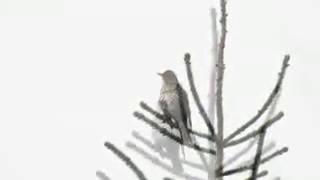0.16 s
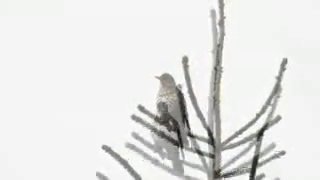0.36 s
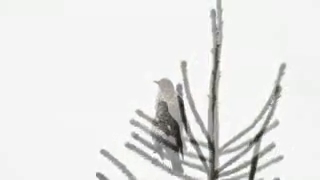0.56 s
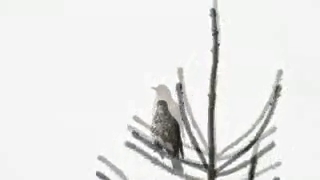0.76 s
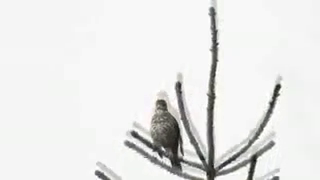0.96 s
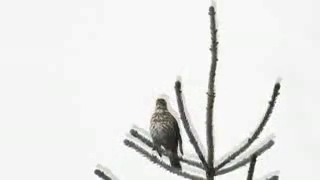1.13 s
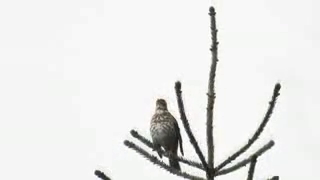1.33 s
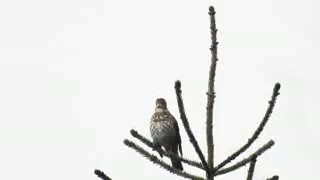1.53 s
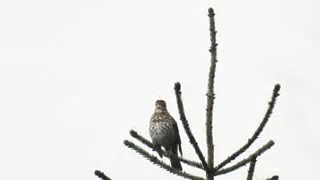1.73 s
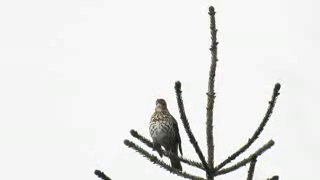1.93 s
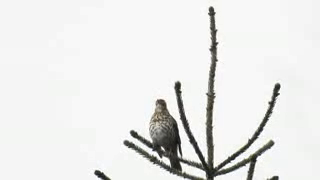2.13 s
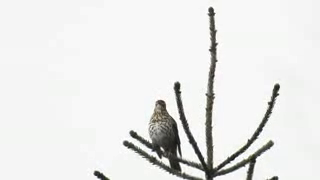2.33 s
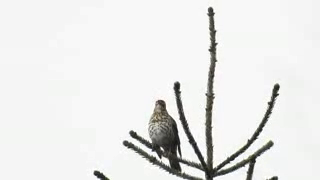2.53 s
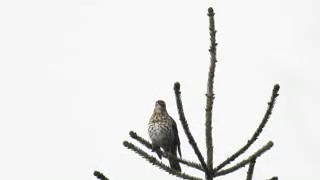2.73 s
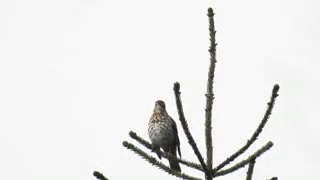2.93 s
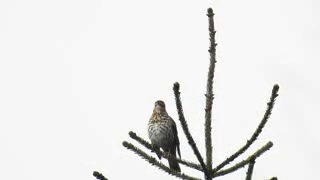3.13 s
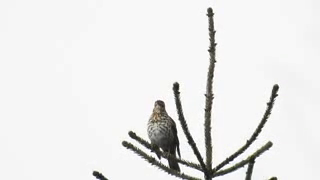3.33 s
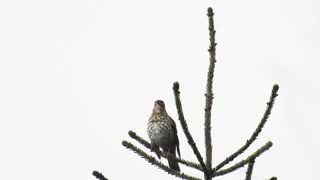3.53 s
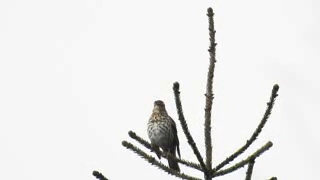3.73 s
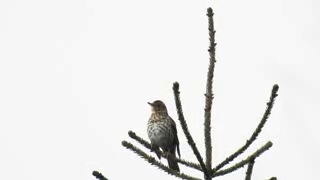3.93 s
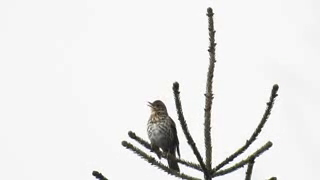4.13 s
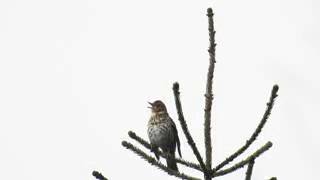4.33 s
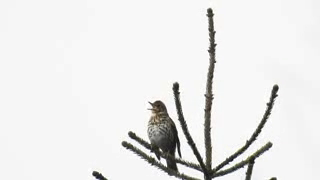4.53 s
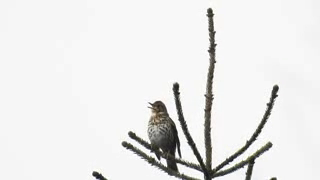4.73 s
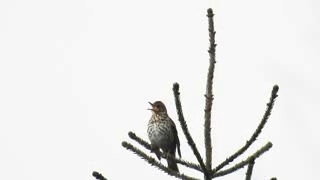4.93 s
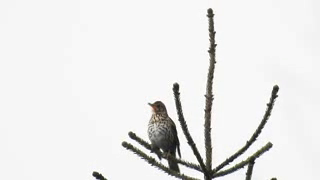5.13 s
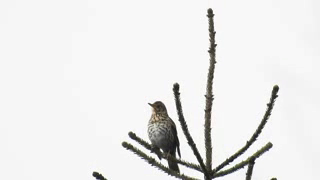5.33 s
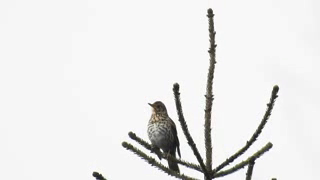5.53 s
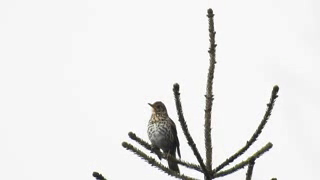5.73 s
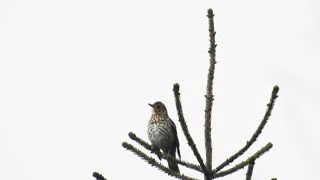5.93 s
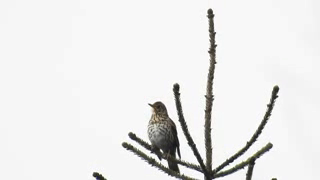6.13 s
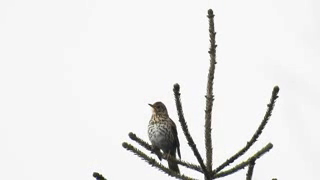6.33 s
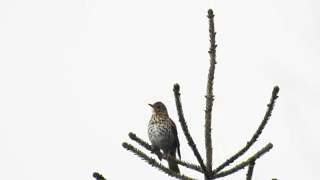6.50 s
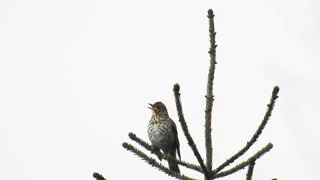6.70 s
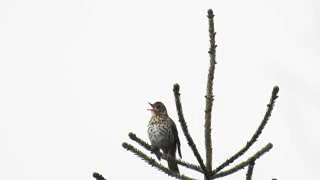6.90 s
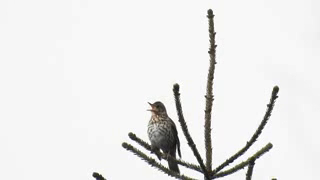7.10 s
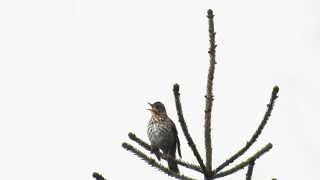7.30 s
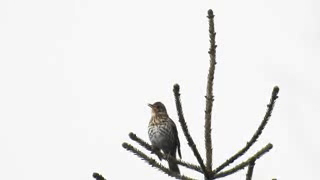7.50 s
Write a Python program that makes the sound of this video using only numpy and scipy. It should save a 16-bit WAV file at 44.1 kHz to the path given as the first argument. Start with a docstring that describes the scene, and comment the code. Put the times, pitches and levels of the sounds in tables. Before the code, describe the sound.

Quick falling chirps, rasps, nasal notes, clear whistles and whip-like sweeps from one thrush, with fainter birds chirping in the woods behind.

```python
"""Over a low outdoor hush and a blurred far chorus, a song thrush opens with quick, bright, falling notes.
From the top of a spruce it goes on with twitters, rasps, whistles, down-sweeps and two-voiced notes.
Each side of its syrinx is a near-sinusoidal gliding tone; the trees scatter it into a fading tail.
Other birds are similar glides, the farther ones with weaker direct sound; shaped noise makes the hush.
A few soft thumps are damped low oscillations."""
import sys
import numpy as np
from scipy import signal
from scipy.fft import rfft, irfft, next_fast_len
from scipy.io import wavfile
from scipy.ndimage import uniform_filter1d

SR = 44100
rng = np.random.default_rng(int(sys.argv[2]) if len(sys.argv) > 2 else 0)


def wrap_up_sound(samples):
    """Save the sound to the file named by the first command line argument, as 16-bit audio."""
    columns = np.atleast_2d(samples).T
    # keep every value between -1 and 1, then stretch to whole-number steps
    tamed = np.clip(columns, -1, 1)
    steps = np.round(tamed * 32767).astype(np.int16)
    wavfile.write(sys.argv[1], SR, steps)


N = 337806
TIME = np.arange(N) / SR


def from_db(db):
    """Logarithmic level: decibels to amplitude gain."""
    return 10 ** (np.asarray(db) / 20)


def rms_one(x):
    """Normalisation: scale a signal to unit rms."""
    return x / np.sqrt(np.mean(x ** 2) + 1e-20)


def drift(rate, size):
    """Random modulation about zero: straight lines join `rate` new normal values a second."""
    knots = rng.standard_normal(4096)
    return np.interp(np.arange(size) / SR * rate, np.arange(len(knots)), knots)


def coloured_noise(spectrum):
    """Spectral shaping: white noise weighted by a level curve over log frequency, at unit rms."""
    hz, db = np.transpose(spectrum)
    fft_size = next_fast_len(N, True)
    bins = np.maximum(np.fft.rfftfreq(fft_size, 1 / SR), 1)
    gain = from_db(np.interp(np.log(bins), np.log(hz), db))
    white = rng.standard_normal(N)
    return rms_one(irfft(rfft(white, fft_size) * gain)[:N])


def add(track, start, sound):
    """Superposition: mix a sound into the track from `start` seconds on."""
    at = int(np.clip(start * SR, 0, N))
    track[at:at + len(sound)] += sound[:N - at]


def contour(rows):
    """Interpolation: start time and smoothed per-sample columns of one note."""
    s, *columns = np.transpose(rows)
    s = np.sort(s) + np.arange(len(s)) / SR  # keeps the times distinct
    t = np.arange(s[0], s[-1], 1 / SR)
    curves = [np.interp(t, s, column) for column in columns]
    return s[0], [uniform_filter1d(curve, size=110, mode="nearest") for curve in curves]


def arch(length, start_hz, middle_hz, end_hz):
    """Parabolic glide: pitch through the start, middle and end of a note."""
    u = np.linspace(0, 1, max(int(length * SR), 20))
    bend = 2 * (2 * middle_hz - start_hz - end_hz)
    return start_hz + (end_hz - start_hz) * u + bend * u * (1 - u)


def syrinx(hz, waver=0.0036, waver_rate=400):
    """Frequency modulation: phase of a membrane following a pitch with slight unsteadiness."""
    return 2 * np.pi * np.cumsum(hz * (1 + waver * drift(waver_rate, len(hz)))) / SR


def valve(size, edge_s=.002):
    """Amplitude gating: the airflow opens and closes quickly at the ends of a note."""
    return signal.windows.tukey(size, min(1, 2 * edge_s * SR / size))


def tone(hz, second_db=-27, throat_hz=7000):
    """Source and filter: the throat passes little second harmonic, and less the higher it lies."""
    phase = syrinx(hz)
    second_gain = from_db(second_db) / (1 + (2 * hz / throat_hz) ** 4)
    return np.sin(phase) + second_gain * np.sin(2 * phase)


def slur(length, start_hz, middle_hz, end_hz, taper=0.87):
    """Joint pitch and amplitude modulation: one parabolic glide that swells and fades."""
    hz = arch(length, start_hz, middle_hz, end_hz)
    return tone(hz) * signal.windows.tukey(len(hz), taper)


def slurs(table, taper):
    """Superposition: a table of glides played in turn."""
    out = np.zeros(N)
    for start, length, start_hz, middle_hz, end_hz, db in table:
        add(out, start, from_db(db) * slur(length, start_hz, middle_hz, end_hz, taper))
    return out


def runs(table, taper):
    """Periodicity: each row sounds its slur at every whole period between start and stop."""
    notes = []
    for start, stop, period, *note in table:
        notes += [(s, *note) for s in np.arange(start, stop, period)]
    return slurs(notes, taper)


def whistled(notes):
    """Membrane control: pure notes follow the tension and the pressure in the syrinx."""
    out = np.zeros(N)
    for note in notes:
        start, (hz, db) = contour(note)
        add(out, start, from_db(db) * tone(hz) * valve(len(hz)))
    return out


def motif(shape, events):
    """Transposition: one gesture sung at other times, pitches and strengths."""
    return whistled([[(s + dt, ratio * hz, db + rel_db) for dt, hz, rel_db in shape]
                     for s, ratio, db in events])


def trees(x, low_t60, high_t60, first_s=0.005, split_hz=4500):
    """Reverberation: a dense unit-energy tail from trunks and crowns, with a t60/s for each band."""
    t = TIME[:SR]
    low_pass = signal.butter(2, split_hz, fs=SR, output="sos")
    high_pass = signal.butter(2, split_hz, "high", fs=SR, output="sos")
    low = signal.sosfilt(low_pass, rng.standard_normal(SR)) * from_db(-60 * t / low_t60)
    high = signal.sosfilt(high_pass, rng.standard_normal(SR)) * from_db(-60 * t / high_t60)
    tail = (low + high) * np.clip(t / first_s - 1, 0, 1)  # silent until first_s
    return signal.fftconvolve(x, rms_one(tail) / np.sqrt(SR))[:N]


def echo(x, delay_s):
    """Specular reflection: one delayed copy."""
    return np.interp(TIME - delay_s, TIME, x, left=0)


def far_twitter(count=1800, low_hz=2600, high_hz=6000, glide=.25):
    """Incoherent summation: many birds' short glides at random times and pitches, at unit rms."""
    out = np.zeros(N)
    for when, pitch, length, rise, curve, strength in rng.random((count, 6)):
        hz = low_hz * (high_hz / low_hz) ** pitch
        bend = glide * np.sign(rise - .4)  # a few more rise than fall
        middle_hz = hz * (1 + glide * (curve - .5))
        note = slur(0.01 + .025 * length, hz * (1 - bend), middle_hz, hz * (1 + bend))
        add(out, when * N / SR, from_db(-24 * strength) * note)
    return rms_one(out)


# spectral density of the blurred chorus: f/Hz, relative level/dB
CHORUS_COLOUR = [(1700, -14.5), (2200, 2.5), (3000, 4.5), (4500, 1), (6000, -1.5), (7000, -11.5),
                 (8500, -55.5)]
# course of the distant birds: t/s, level before CHORUS_DB/dB
CHORUS_LEVEL = [(0.0, -44), (0.45, -48), (0.64, -55.5), (2.41, -51), (2.79, -51.5), (3.2, -47), (3.88, -47),
                (4.46, -53), (4.93, -50.5), (5.37, -52.5), (5.76, -52), (6.31, -58.5), (6.98, -55.5),
                (7.25, -48), (7.42, -52.5), (7.66, -55.5)]
CHORUS_DB = 4.5  # gain on the course


def chorus():
    """Diffuse field: distant twitter, its scattered tail and shaped noise merge."""
    twitter = far_twitter()
    blur = from_db(-5) * twitter
    blur += from_db(-1.5) * trees(twitter, low_t60=0.24, high_t60=0.19)
    blur += from_db(-5.5) * coloured_noise(CHORUS_COLOUR)
    course_db = np.interp(TIME, *np.transpose(CHORUS_LEVEL))
    return from_db(CHORUS_DB + course_db + 0.53 * drift(13, N)) * rms_one(blur)


# spectral density of the rustle: f/Hz, relative level/dB
RUSTLE_COLOUR = [(100, -1.5), (280, -1), (450, -2), (800, -9.5), (1250, -9), (1800, -14), (4000, -58)]
# course of the low rustle of air: t/s, level before RUSTLE_DB/dB
RUSTLE_LEVEL = [(0.0, -55.5), (3.56, -57.5), (3.88, -54), (5.12, -51), (5.57, -57.5), (5.85, -56.5),
                (5.99, -54.5), (6.23, -51.5), (7.21, -57.5), (7.66, -55)]
RUSTLE_DB = -0.5  # gain on the course


def rustle():
    """Modulated noise: a low rustle of air rises and falls."""
    course_db = np.interp(TIME, *np.transpose(RUSTLE_LEVEL))
    return from_db(RUSTLE_DB + course_db + 3.1 * drift(25, N)) * coloured_noise(RUSTLE_COLOUR)


# spectral density of the hush: f/Hz, relative level/dB
HUSH_COLOUR = [(12, -23), (20, 3.5), (65, 3), (124, -8.5), (197, -3.5), (260, -20.5), (498, -16.5),
               (904, -22), (1050, -16.5), (1220, -32.5), (1700, -32.5), (2210, -50.5), (3740, -120)]
HUSH_DB = -52  # centre of the drifting level


def hush():
    """Modulated noise: a low outdoor hush with a slightly unsteady level."""
    return from_db(HUSH_DB + 1.1 * drift(8.9, N)) * coloured_noise(HUSH_COLOUR)


def air():
    """Stationary noise: a faint, steady hiss."""
    colour = [(500, -19.0), (1700, -1.5), (5000, -5.5), (7000, 2.0), (9000, -14)]  # f/Hz, level/dB
    return from_db(-60.5) * coloured_noise(colour)


# short arched slurs: start t/s, length t/s, start f/Hz, middle f/Hz, end f/Hz, level/dB
SLURS = [ (.006, 0.021, 8240, 6980, 6550, -29.5), (.297, 0.0044, 6320, 5300, 4700, -33),
         (.324, .025, 3170, 3240, 3950, -37.5), (.616, 0.027, 2490, 3050, 2650, -30),
         (1.19, .03, 3030, 3374, 2970, -36), (1.366, 0.023, 2640, 3120, 2820, -34),
         (2.277, 0.033, 4460, 4240, 3850, -39.5), (3.99, 0.038, 2510, 2770, 3130, -36.5),
         (4.724, .035, 3560, 3320, 3420, -38), (5.123, 0.0034, 6500, 5990, 5270, -23),
         (5.173, 0.0084, 4150, 5630, 6450, -29), (5.598, 0.073, 2545, 2740, 2980, -36.5),
         (5.622, 0.038, 3620, 3430, 4000, -33.5), (5.658, .05, 3700, 4150, 3250, -36.5),
         (5.903, 0.033, 3710, 3870, 3230, -36.5), (5.975, 0.026, 2970, 3370, 3230, -38.5),
         (6.69, 0.12, 2720, 2884, 2590, -43), (6.945, .021, 2980, 3620, 2900, -40),
         (7.05, .018, 5750, 4860, 4140, -30.5), (7.051, .016, 7830, 7100, 6500, -38.5),
         (7.102, 0.015, 2780, 3720, 3140, -32.5), (7.168, .035, 3460, 3100, 2460, -35),
         (7.385, .039, 2600, 3570, 3600, -39), (7.385, 0.045, 7000, 6230, 6120, -36), ]


def arched_slurs():
    """Parabolic glide: short slurred notes, single glides up, down or over a bend."""
    return slurs(SLURS, taper=0.34)


# reflections from the ground: delay t/s, level against the direct sound/dB
NEAR_ECHOES = [(.012, -17), (0.0157, -12.5)]


def near_field(song):
    """Direct and reverberant sound: the song, two ground echoes, a short and a long scattered tail."""
    near = song + sum(from_db(db) * echo(song, s) for s, db in NEAR_ECHOES)
    near += from_db(-14) * trees(song, low_t60=.14, high_t60=.2)
    near += from_db(-8.5) * trees(song, low_t60=0.98, high_t60=0.63)
    return near


# notes that hold and then droop: start t/s, length t/s, held f/Hz, end f/Hz, level/dB
DROOPS = [ (.024, .023, 6700, 5800, -22.5), (.048, 0.025, 6340, 5550, -19),
          (.175, 0.015, 5640, 4070, -32.5), (1.192, 0.052, 2363, 1993, -28),
          (1.255, .059, 2944, 1993, -29.5), (1.373, 0.032, 2370, 2080, -33.5),
          (2.299, .079, 2500, 2428, -38), (3.848, .11, 2510, 2427, -39.5),
          (4.017, 0.069, 2527, 2240, -37.5), (5.738, 0.038, 2688, 2645, -34),
          (7.062, .021, 6420, 5900, -24), (7.085, 0.016, 6230, 4980, -19), (7.157, 0.011, 5390, 3550, -22),
          ]
# how late the pitch gives way; share of the note spent swelling and fading
DROOP_POWER, DROOP_TAPER = 2.2, 0.28


def droops():
    """Power-law glide: the tension holds, then gives way ever faster."""
    out = np.zeros(N)
    for start, length, held_hz, end_hz, db in DROOPS:
        u = np.linspace(0, 1, int(length * SR))
        hz = held_hz + (end_hz - held_hz) * u ** DROOP_POWER
        swell = signal.windows.tukey(len(u), DROOP_TAPER)
        add(out, start, from_db(db) * swell * tone(hz))
    return out


# whistles, one brief and two drawn out, one curve a note: t/s, f/Hz, rms level/dB
WHISTLES = [
    [(0.072, 6290, -25), (0.088, 5886, -17), (0.108, 5854, -24.5), (0.123, 5600, -26)],
    [(2.125, 2474, -42), (2.171, 2459, -46), (2.251, 2512, -43), (2.297, 2864, -41)],
    [(5.176, 6100, -25.5), (5.184, 6700, -26), (5.194, 6841, -23.5), (5.294, 6763, -27),
     (5.302, 6821, -31.5), (5.314, 6820, -23), (5.338, 6830, -25.5), (5.368, 6900, -36.5)],
]


def curved_whistles():
    """Membrane control: three whistles, each with its own curve of pitch and level."""
    return np.sqrt(2) * whistled(WHISTLES)  # rms to peak


# soft thumps: start t/s, f/Hz, level/dB, decay t60/s
THUMPS = [(0.19, 134, -29.5, 0.026), (0.423, 132, -20, 0.03), (1.158, 60, -34, 0.097),
          (1.346, 258, -32.5, 0.02), (1.688, 205.2, -26.5, 0.023), (1.923, 223, -33, 0.1),
          (2.454, 228, -42.5, 0.25), (3.695, 920, -29, 0.01), (3.705, 300, -31, 0.011),
          (6.015, 172, -23.5, 0.016)]


def thumps():
    """Damped oscillation: dull knocks, each a sinusoid that dies exponentially."""
    out, t = np.zeros(N), TIME[:SR // 2]
    for start, hz, db, t60 in THUMPS:
        onset = 1 - np.exp(-t / 0.00045)
        add(out, start, from_db(db - 60 * t / t60) * np.sin(2 * np.pi * hz * t) * onset)
    return out


# thin whistles of birds farther off, levels before the far field:
# start t/s, length t/s, held f/Hz, start below held (negative: above) f/Hz, held level/dB
THIN_WHISTLES = [(0.571, 0.1, 7560, 7, -44), (1.504, 0.11, 7470, 2498, -41.5),
                 (2.848, 0.081, 7520, 700, -47.5), (3.08, 0.069, 7600, 2, -51),
                 (3.432, 0.057, 6800, 301, -42), (5.986, 0.17, 7580, -11, -51.5),
                 (6.243, 0.13, 7530, 2495, -45.5), (6.504, 0.12, 7660, 2304, -44)]
SCOOP_S, SCOOP_DB = .009, 5  # time constant of settling; extra level at the start


def thin_whistles():
    """Exponential relaxation: high whistles settle to their pitch, most from below, and hold it."""
    out = np.zeros(N)
    for start, length, held_hz, scoop_hz, db in THIN_WHISTLES:
        scoop = np.exp(-TIME[:int(length * SR)] / SCOOP_S)
        level = from_db(db + SCOOP_DB * np.sqrt(scoop))
        add(out, start, level * tone(held_hz - scoop_hz * scoop) * valve(len(scoop)))
    return out


# echoes of the farther birds: delay t/s, level against their direct sound/dB
FAR_ECHOES = [(0.017, -11), (0.045, -26), (.063, -15)]


def far_field(calls):
    """Direct and reverberant sound: weakened calls, distinct echoes and a scattered tail."""
    direct = calls + sum(from_db(db) * echo(calls, s) for s, db in FAR_ECHOES)
    return from_db(-3.5) * direct + from_db(-5.0) * trees(calls, low_t60=0.74, high_t60=0.47)


# a low note that flicks up and drops away: t from its crest/s, f/Hz, relative level/dB
HOOK_SHAPE = [(-.033, 2156, -9.5), (-.012, 2226, -4.5), (0, 2480, 3.5), (.013, 1982, -8)]
# crest t/s, pitch ratio/1, level/dB
HOOKS = [(.66, 0.99, -24.5), (1.829, 0.99, -25.5), (1.991, .94, -27.5)]


def hooks():
    """Transposition: the low, flicked note recurs."""
    return motif(HOOK_SHAPE, HOOKS)


# a far bird's falling note: t from its start/s, f/Hz, relative level/dB
FALL_SHAPE = [(0, 5915, -12), (.012, 5720, -1.5), (.04, 5380, -1), (.064, 5170, -1), (.08, 4940, -13)]
# start t/s, pitch ratio/1, level before the far field/dB
FALLS = [(.778, 0.99, -37), (.904, 1, -36), (1.026, 0.99, -34.5), (1.151, 1.01, -35.5), (1.276, 1.0, -32.5),
         (6.727, 1.022, -33), (6.846, 1.015, -32.5), (6.991, 0.98, -32)]


def far_falls():
    """Transposition: a far bird repeats its falling note."""
    return motif(FALL_SHAPE, FALLS)


# single far slurs, levels before the far field:
# start t/s, length t/s, start f/Hz, middle f/Hz, end f/Hz, level/dB
FAR_CALLS = [ (.9, .33, 3160, 3084, 2810, -46), (2.16, 0.013, 4300, 4300, 4100, -37),
             (2.866, 0.017, 4860, 4850, 4930, -39.5), (2.992, 0.013, 4930, 4600, 5060, -41),
             (3.64, 0.03, 7000, 6620, 5770, -37), (3.885, 0.021, 6150, 6240, 6660, -36.5),
             (3.91, 0.059, 4355, 4510, 4330, -35.5), (4.28, 0.062, 5630, 5670, 5780, -51.5),
             (5.3, 0.05, 3550, 3820, 4120, -36.5), ]


def far_calls():
    """Parabolic glide: single slurs of farther birds."""
    return slurs(FAR_CALLS, taper=0.25)


# rasps: start t/s, length t/s, pulse rate f/Hz, mid-pulse f/Hz, pulsing level/dB, lower level/dB
RASPS = [(1.432, 0.032, 95, 2960, -27.5, -37), (1.497, 0.034, 121, 2973, -26, -38),
         (1.557, 0.059, 63, 3010, -29.5, -36), (1.636, 0.037, 110, 2900, -27, -40),
         (1.781, 0.027, 92, 2764, -28, -36.5), (1.951, 0.013, 80, 2850, -29, -34),
         (7.515, 0.052, 64, 2505, -40, -52), (7.619, .048, 300, 2970, -34.5, -65)]
RASP_SWEEP_HZ, LOWER_VOICE_HZ = 453, 2078  # rise over each pulse; the other side's pitch


def rasps(rough=0.022, second_db=-15):
    """Two-source phonation: one side of the syrinx stutters upward, the other holds a low tone."""
    out = np.zeros(N)
    for start, length, per_s, hz, pulse_db, lower_db in RASPS:
        size = int(length * SR)
        cycle = np.cumsum(per_s * (1 + 0.09 * drift(100, size))) / SR % 1
        upper_hz = (hz + RASP_SWEEP_HZ * (cycle - .5)) * (1 + rough * drift(700, size))
        pulses = np.sin(np.pi * cycle ** 0.76) ** 2 * tone(upper_hz, second_db)
        lower = tone(LOWER_VOICE_HZ * (1 + rough * drift(320, size)), second_db)
        add(out, start, from_db(pulse_db) * pulses * valve(size))
        add(out, start, from_db(lower_db) * lower * valve(size, edge_s=0.012))
    return out


# short slurs, most of them repeated: start t/s, stop t/s, period t/s, note length t/s,
# start f/Hz, middle f/Hz, end f/Hz, level/dB
RUNS = [ (2.078, 2.12, 0.025, 0.017, 2750, 2320, 1600, -41.5),
        (3.805, 3.845, 0.026, .021, 2900, 2420, 2300, -37.5),
        (3.3, 3.45, 0.27, 0.039, 2200, 2410, 1800, -47),
        (2.945, 3.65, .159, 0.033, 3200, 3850, 4350, -39.5), ]


def paced_slurs():
    """Periodicity: short slurs, most of them repeated at a steady pace."""
    return runs(RUNS, taper=0.36)


# a tiny rising pip: t from its start/s, f/Hz, relative level/dB
PIP_SHAPE = [(0, 3070, -8), (.006, 3230, 0), (.016, 3370, -7)]
# start t/s, pitch ratio/1, level/dB
PIPS = [(2.375, 1.1, -37), (2.478, 1, -34.5), (2.576, 1.01, -36), (2.676, 0.99, -35.5), (2.773, 1.0, -34.5),
        (2.861, 0.97, -39.5)]


def pips():
    """Transposition: a tiny rising note recurs."""
    return motif(PIP_SHAPE, PIPS)


# far birds' runs, levels before the far field: start t/s, stop t/s, period t/s, note length t/s,
# start f/Hz, middle f/Hz, end f/Hz, level/dB
FAR_RUNS = [(2.962, 3.2, .163, 0.02, 4930, 4720, 4280, -33),
            (3.787, 3.855, 0.023, 0.026, 7460, 6600, 6550, -40)]


def far_runs():
    """Periodicity: farther birds repeat a slur."""
    return runs(FAR_RUNS, taper=0.36)


# nasal notes: start t/s, length t/s, start f/Hz, middle f/Hz, end f/Hz, cleared second partial level/dB,
# overtone level before clearing/dB, clearing t from start/s, pitch roughness/1
NASAL_NOTES = [(4.375, 0.0854, 1375, 1472, 1370, -29, -39.5, 0.018, 0.024),
               (4.54, 0.161, 1377, 1346, 1324, -23.5, -32.5, 0.03, 0.0062)]
# the reedy partials: partial number/1, relative level/dB
OVERTONES = [(1, -24), (3, -2), (4, -5), (5, -13), (6, -21.5)]
# time scale of clearing; change of overtones once clear; change of second partial before
CLEARING_S, REED_LOSS_DB, NASAL_ONSET_DB = 0.0094, -13, -25.5


def nasal_notes(reed_waver=0.0037):
    """Resonance tuning: a reedy vibration clears as the throat tunes to its second partial."""
    out = np.zeros(N)
    for (start, length, start_hz, middle_hz, end_hz,
         second_db, overtone_db, clears, rough) in NASAL_NOTES:
        hz = arch(length, start_hz, middle_hz, end_hz)
        clear = .5 + .5 * np.tanh((TIME[:len(hz)] - clears) / (2 * CLEARING_S))  # 0 reedy, 1 clear
        phase = syrinx(hz * (1 + reed_waver * drift(61, len(hz))), waver=rough)
        overtones = sum(from_db(db) * np.sin(round(k) * phase) for k, db in OVERTONES)
        reedy = from_db(overtone_db + REED_LOSS_DB * clear ** 4) * overtones
        second = from_db(second_db + NASAL_ONSET_DB * (1 - clear) ** 2) * np.sin(2 * phase)
        add(out, start, (second + reedy) * valve(len(hz), edge_s=0.0076))
    return out


# stepped whistles: step t/s, held t/s, start f/Hz, middle f/Hz, end f/Hz, mid-tone level/dB
STEPS = [(4.833, 0.071, 2980, 3185, 3054, -19), (5.009, 0.066, 2754, 2700, 2414, -20)]
# the slide before the step: t from it/s, ratio to start pitch/1, relative level/dB
STEP_LEAD = [(-.027, 1.55, -23), (-.017, 1.38, -10.5), (-.005, 1.35, -8)]
STEP_ONSET_DB, STEP_END_DB = 0.5, -10.5  # against the middle of the held tone


def stepped_whistles():
    """Register step: a soft slide from above drops suddenly onto a loud held tone that fades."""
    notes = []
    for s, held, start_hz, middle_hz, end_hz, db in STEPS:
        lead = [(s + dt, ratio * start_hz, db + rel_db) for dt, ratio, rel_db in STEP_LEAD]
        onset = (s, start_hz, db + STEP_ONSET_DB)
        middle = (s + held / 2, middle_hz, db)
        end = (s + held, end_hz, db + STEP_END_DB)
        notes.append(lead + [onset, middle, end])
    return whistled(notes)


# a whip-like down-sweep with a soft low tail: t from its start/s, f/Hz, relative level/dB
WHIP_SHAPE = [(0, 7290, -11.5), (.006, 5940, -1.5), (.0095, 4536, -5.5), (.014, 3380, -24),
              (.02, 3130, -13), (.026, 2320, -29)]
# start t/s, pitch ratio/1, level/dB
WHIPS = [(7.109, 0.96, -16), (7.133, 0.94, -19.5), (7.228, 1.0, -18), (7.281, 1.0, -18.5),
         (7.349, 0.99, -19)]


def whips():
    """Transposition: a rapid down-sweep recurs."""
    return motif(WHIP_SHAPE, WHIPS)


# two-voiced notes: start t/s, length t/s, shake begins after t/s, level/dB
DUETS = [(7.424, .097, .042, -16), (7.572, .082, .053, -17)]
# the two sides of the syrinx: slack f/Hz, taut f/Hz, slack relative level/dB, taut relative level/dB
DUET_VOICES = [(5050, 6050, -12, -1), (5800, 8040, 0.5, -17.5)]
DUET_RISE_S, DUET_RELAX_S = .027, 0.162  # time to tighten; time constant of relaxing
SHAKE_PER_S, SHAKE_DEPTH = 58, .8  # tension dips a second; share of tension lost in a dip


def duets(attack_s=.009, unsteady=0.036):
    """Coupled control: rising tension strengthens the lower voice and thins the upper."""
    out = np.zeros(N)
    for start, length, shake_at, db in DUETS:
        t = TIME[:int(length * SR)]
        rise = np.sin(np.pi / 2 * np.minimum(t / DUET_RISE_S, 1)) ** 2
        shaking = np.maximum(t - shake_at, 0)
        shake = 1 - SHAKE_DEPTH * np.sin(np.pi * SHAKE_PER_S * shaking) ** 2
        tension = rise * np.exp(-shaking / DUET_RELAX_S) * shake
        tension += unsteady * drift(70, len(t))
        pressure = from_db(db) * (1 - np.exp(-t / attack_s)) * valve(len(t))
        for slack_hz, taut_hz, slack_db, taut_db in DUET_VOICES:
            strength = from_db(slack_db + (taut_db - slack_db) * tension)
            voice = tone(slack_hz + (taut_hz - slack_hz) * tension)
            add(out, start, pressure * strength * voice)
    return out


def scene():
    """Superposition: the stronger birdsong with echoes, farther birds, thumps and the hush of the wood."""
    background = chorus() + rustle() + hush() + air()
    song = arched_slurs() + droops() + curved_whistles() + hooks() + rasps() + paced_slurs()
    song += pips() + nasal_notes() + stepped_whistles() + whips() + duets()
    calls = thin_whistles() + far_falls() + far_calls() + far_runs()
    return background + near_field(song) + thumps() + far_field(calls)


def record(dry):
    """Low-pass filtering: a steep elliptic cut above 9 kHz."""
    return signal.sosfilt(signal.ellip(10, .1, 80, 9000, fs=SR, output="sos"), dry)


dry = scene()
out = record(dry)
wrap_up_sound(out)
```